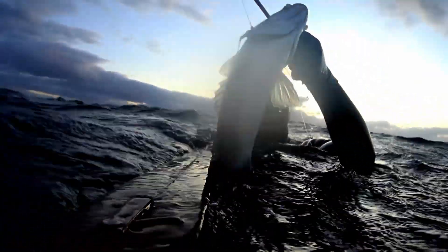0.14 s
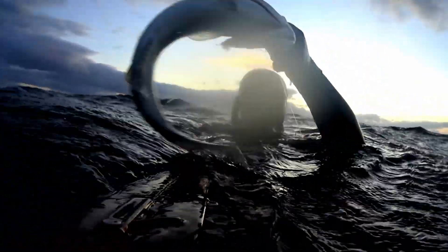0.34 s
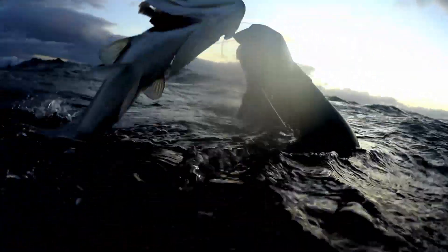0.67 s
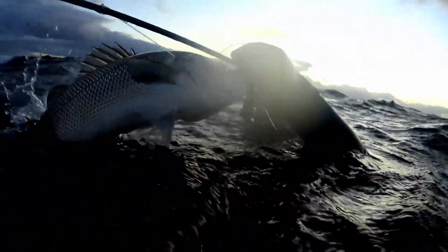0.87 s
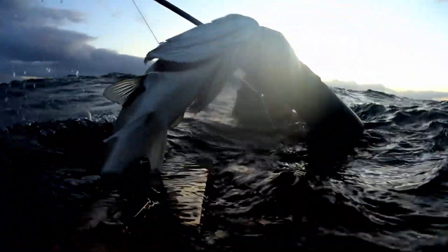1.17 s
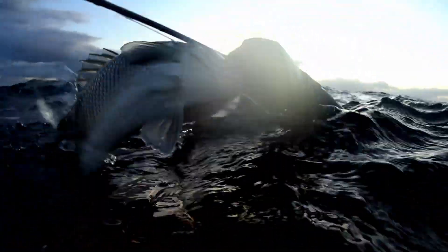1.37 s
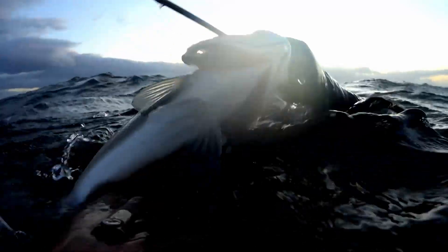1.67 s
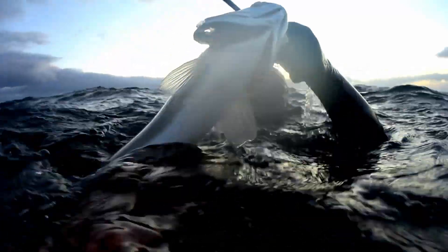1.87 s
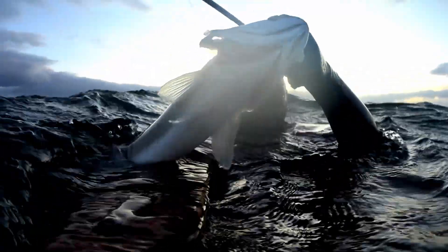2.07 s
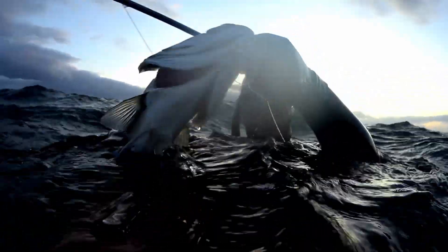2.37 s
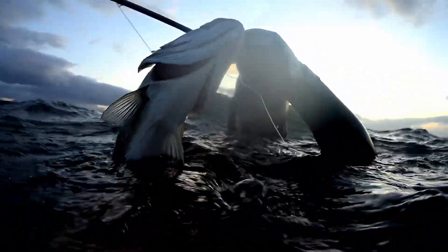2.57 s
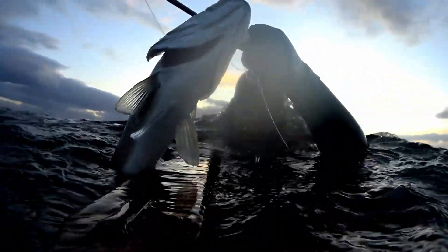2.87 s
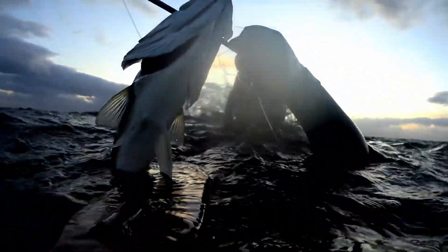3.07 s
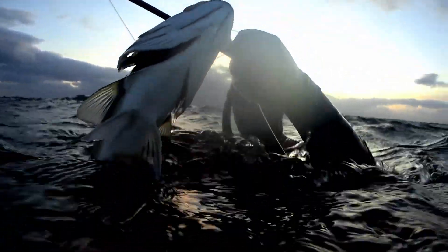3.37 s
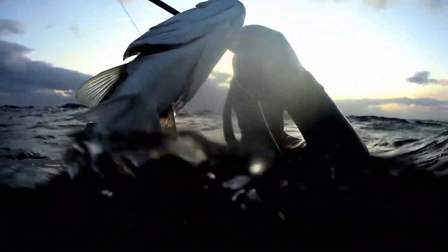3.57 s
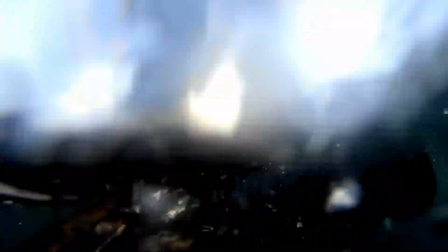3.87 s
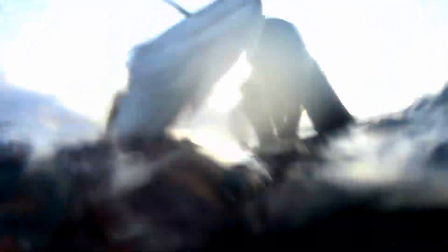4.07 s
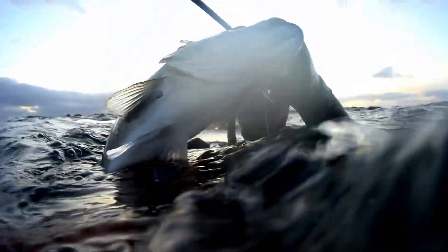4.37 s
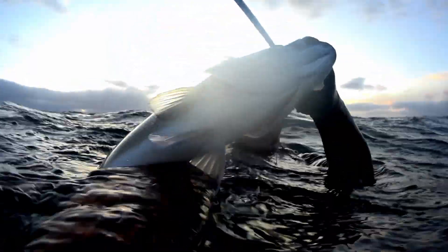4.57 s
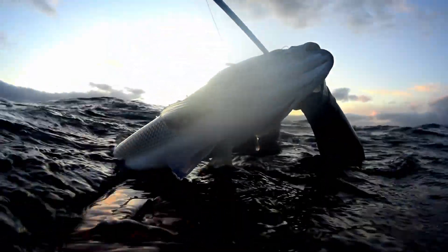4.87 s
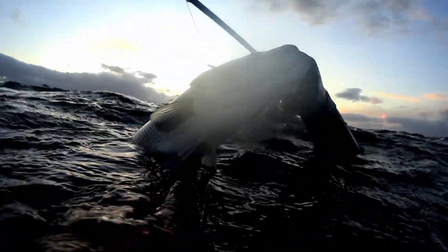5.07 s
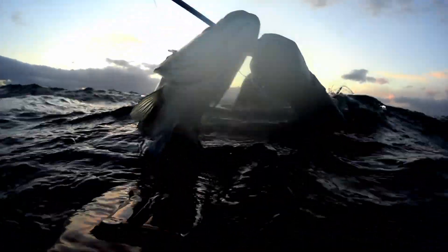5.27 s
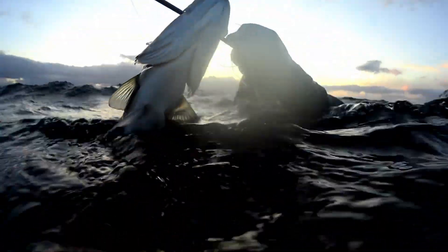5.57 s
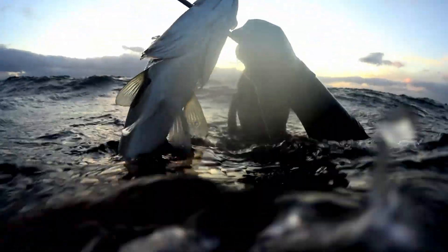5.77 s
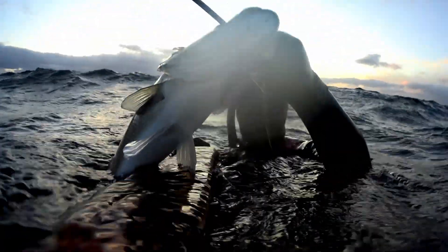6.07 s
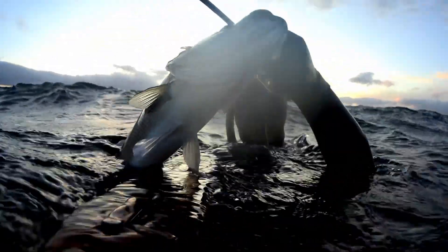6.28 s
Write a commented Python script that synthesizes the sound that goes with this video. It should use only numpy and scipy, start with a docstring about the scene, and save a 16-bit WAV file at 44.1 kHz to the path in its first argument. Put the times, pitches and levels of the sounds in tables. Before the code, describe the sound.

Uneven surface sloshing close up, with bubbly plops, dull spray slaps and low swell thuds that bunch up, thin out, then bunch again.

```python
"""Choppy sea water sloshes round a camera in a waterproof case at the surface, for 6.4 s.
Throughout, swell, churning bubble swarms and froth rise and sink with passing wavelets.
Scattered plops (ringing air pockets) and a few slaps of spray come first, with light thuds of swell.
They crowd together from 3.3 to 4.3 s, thin out to mostly low, faint plops, and crowd again from 5.5 to 6.1 s.
A faint hiss lies under it all; the top of the band is cut off."""
import sys
import numpy as np
from scipy.fft import rfft, irfft, next_fast_len
from scipy.io import wavfile
from scipy.ndimage import uniform_filter1d, map_coordinates

SR = 44100
rng = np.random.default_rng(int(sys.argv[2]) if len(sys.argv) > 2 else 0)


def store_wav(level_fs):
    """Save 16-bit WAV to argv[1]."""
    pcm = np.round(np.clip(np.atleast_2d(level_fs), -1, 1) * 32767)
    wavfile.write(sys.argv[1], SR, pcm.T.astype(np.int16))


N = 283549

# what the case lets through, spectrum shape: f/Hz, level/dB
CASE_PASS = [(100, -11.5), (500, 17), (1600, 11), (2700, 4), (3700, -1.5), (4800, -12), (6400, -10),
             (8500, -22.5), (15000, -33.5)]


def amp(db):
    """Amplitude of a level in dB."""
    return 10 ** (np.asarray(db) / 20)


def unit(x):
    """x scaled to rms 1 over all channels."""
    return x / np.sqrt(np.mean(x ** 2) + 1e-20)


def gains(points, hz):
    """Gain of (f/Hz, level/dB) points, read on a log frequency axis."""
    f, db = np.transpose(points)
    return amp(np.interp(np.log(hz + 1), np.log(f), db))


def filtered(x, response):
    """x times a response of frequency, by zero-padded FFT."""
    n = x.shape[-1]
    m = next_fast_len(n + 2 ** 12)
    spectrum = rfft(x, m) * response(np.fft.rfftfreq(m, 1 / SR))
    return irfft(spectrum, m)[..., :n]


def coloured(x, points):
    """x shaped by the given spectrum, at rms 1."""
    return unit(filtered(x, lambda hz: gains(points, hz)))


def noise(length=N):
    """Stereo white noise, independent at each port."""
    return rng.standard_normal((2, length))


def wobble(rate_hz):
    """Smooth random curve, rate_hz knots a second."""
    knots = rng.standard_normal(int(N * rate_hz / SR) + 4)
    return map_coordinates(knots, [np.arange(N) * rate_hz / SR])


def sides(db):
    """Left and right gains for a left-over-right level difference, at equal power."""
    return unit(amp(np.array([[db], [-db]]) / 2))


def add(out, s, sound):
    """Mix a stereo sound in at time s."""
    part = out[:, max(0, round(s * SR)):][:, :sound.shape[1]]
    part += sound[:, :part.shape[1]]


def even(x):
    """Swarm held to an even mean level, so that the waves alone set its strength."""
    power = uniform_filter1d(np.mean(x ** 2, axis=0), size=2200)
    return x / np.sqrt(np.abs(power) + 0.0064)


def together(calm_db, *parts):
    """Amplitude of independent parts over a calm level: powers add."""
    return np.sqrt(amp(calm_db) ** 2 + sum(part ** 2 for part in parts))


def bubble(t, hz, swell, fade, rise):
    """An air pocket swells as it pinches off, then rings out, rising in pitch as it nears the surface."""
    t = np.maximum(t, 0)
    attack = np.sin(np.pi / 2 * np.minimum(t / swell, 1)) ** 2
    decay = np.exp(1 / 2 - np.hypot(np.maximum(t - swell, 0) / fade, 1 / 2))
    cycles = hz * t * (1 + np.log(2) * rise * t / 2)
    return attack * decay * np.sin(2 * np.pi * cycles)


def swarm(starts, length, low_hz, high_hz, cycles, spread_db, rise, size):
    """Small bubbles born at the given samples; each reaches the two ports with its own strength and delay."""
    pitch, life, strength, pan, lag = rng.random((len(starts), 5)).T[..., None]
    hz = low_hz * (high_hz / low_hz) ** pitch
    fade_s = cycles * 2 ** (2 * life - 1) / hz
    k = np.arange(size)
    at = (starts.astype(int)[:, None] + k).ravel()
    taper = 1 - k / size
    pair = []
    for side in (-1, 1):
        delay_s = (1 / 2 + side * (lag - 1 / 2) / 2) / hz
        ring = bubble(k / SR - delay_s, hz, 2 / hz, fade_s, rise)
        gain = amp(spread_db * strength ** 2 + side * 11.5 * (pan - 1 / 2)) * hz
        pair.append(np.bincount(at, (ring * gain * taper).ravel(), length)[:length])
    return unit(np.array(pair))


def crests(events, now):
    """Amplitude of passing crests: each builds up and sinks back, and their powers add."""
    crest_shape, back_stretch = 1.57, 1.34  # 1 = peaked, 2 = round; back length over front length
    s, db, half_s = np.transpose(events)[..., None]
    distance = np.maximum(s - now, (now - s) / back_stretch) / half_s
    return np.linalg.norm(amp(db) * np.exp(-distance ** crest_shape), axis=0)


def foam(now):
    """Amplitude of the froth on breaking crests: it flares up and fizzes away."""
    # crests breaking into froth: t/s, level/dB, fade/s
    breaking_crests = [(0.538, -60, 0.027), (1.861, -46, 0.021), (2.83, -56.5, 0.024), (3.42, -47.5, 0.085),
                       (3.611, -39, 0.1), (3.69, -43, 0.06), (3.97, -49, 0.15), (5.59, -56.5, 0.14),
                       (5.75, -52, 0.082), (5.87, -46, 0.034), (6.07, -58.5, 0.19)]
    rise_s = 0.034
    s, db, fade_s = np.transpose(breaking_crests)[..., None]
    distance = np.maximum((s - now) / rise_s, (now - s) / fade_s)
    return np.linalg.norm(amp(db) * np.exp(-distance), axis=0)


def swell_pressure(chop):
    """Swell presses on the case: low noise that follows the wavelets."""
    # spectrum shape: f/Hz, level/dB
    swell_spectrum = [(20, -21.5), (44, -22.5), (58, 8.5), (72, -4.5), (100, -3), (150, -17), (400, -81.5)]
    calm_db, wave_db = -68, -16.5  # between waves; relative to wavelet churn
    level = together(calm_db, amp(wave_db) * chop)
    return level * even(coloured(noise(), swell_spectrum))


def churning(chop, lap):
    """Bubble swarms and noise churn with the wavelets; single small bubbles trickle on top."""
    # spectrum shape: f/Hz, level/dB
    churn_spectrum = [(50, -21), (110, -5), (170, 2.5), (280, -6.5), (390, 1.5), (490, -10), (650, -9),
                      (1000, -22), (2000, -43.5), (5000, -77.5)]
    calm_db, ripple_db, trickle_db = -62, 1.9, -22.5  # trickle relative to churn
    level = together(calm_db, chop)
    gurgle = swarm(N * rng.random(900), N, low_hz=96.64, high_hz=713, cycles=6.1,
                   spread_db=7.5, rise=1.9, size=2600)
    churn = even(coloured(gurgle, churn_spectrum) + coloured(noise(), churn_spectrum) / 2)
    trickle = swarm(N * rng.random(260), N, low_hz=596, high_hz=1824, cycles=4.9,
                    spread_db=14.5, rise=5.1, size=800)
    return level * (amp(ripple_db * lap) * churn + amp(trickle_db) * trickle)


def frothing(chop, breakers, lap):
    """Froth fizzes on the crests: gentle lapping mostly whispers, breaking water is full of bubbles."""
    # spectrum shape: f/Hz, level/dB
    froth_spectrum = [(300, -19), (700, 11), (1200, 14.5), (2000, -5.5), (3200, -21.5), (4800, -48),
                      (6500, -31.5), (9000, -28), (15000, -40)]
    calm_db, wave_db, ripple_db = -72.5, -29.5, 4  # wave_db relative to wavelet churn
    level = together(calm_db, amp(wave_db) * chop, breakers)
    fizz = swarm(N * rng.random(4500), N, low_hz=650, high_hz=7000, cycles=4,
                 spread_db=13, rise=4, size=320)
    bubble_share = np.clip((20 * np.log10(level) + 76) / 20, .3, .85)  # of power
    bubbles = np.sqrt(bubble_share) * even(coloured(fizz, froth_spectrum))
    whisper = np.sqrt(1 - bubble_share) * coloured(noise(), froth_spectrum)
    return amp(ripple_db * lap) * level * (bubbles + whisper)


def mist(breakers, lap):
    """Breaking froth throws fine spray on the case: noise coloured by the case."""
    mist_db, ripple_db = -18, -0.5  # mist relative to breaking froth
    return amp(ripple_db * lap) * amp(mist_db) * breakers * coloured(noise(), CASE_PASS)


def sea():
    """Wavelets drive swell, churn and froth; breaking crests add froth and mist; ripples shake the last three."""
    # wavelets passing the case: crest t/s, churn level/dB, half length of front/s
    wavelets = [ (.17, -45, 0.068), (.31, -41, 0.072), (.51, -45, 0.067), (.86, -53.5, 0.049),
                (1.11, -55.5, 0.097), (1.26, -48.5, 0.076), (1.62, -54.5, 0.084), (1.78, -44, 0.056),
                (2.13, -40, 0.099), (2.25, -42, 0.064), (2.87, -50.5, 0.037), (3.07, -50.5, 0.15),
                (3.35, -44, 0.097), (3.63, -42, 0.08), (3.9, -37.5, 0.15), (4.28, -43.5, 0.082),
                (4.44, -46.5, 0.04), (4.59, -47.5, 0.12), (4.75, -44, 0.017), (5.02, -42.5, 0.06),
                (5.58, -47.5, 0.11), (5.83, -40, 0.051), (6.06, -47, 0.09), (6.23, -42, 0.039),
                (6.37, -57, 0.062)]
    now = np.arange(N) / SR
    chop, breakers = crests(wavelets, now), foam(now)
    ripple = wobble(28)
    lap = ripple + np.abs(ripple) / 2  # short crests, calm troughs
    water = swell_pressure(chop) + churning(chop, lap)
    return water + frothing(chop, breakers, lap) + mist(breakers, lap)


def surges():
    """Each surge throbs at one deep, unsteady pitch and shoves water along the case."""
    # swell thudding on the case: crest t/s, throb level/dB, half length of front/s, f/Hz
    thuds = [(0.16, -47.5, 0.12, 75.7), (.315, -39, 0.033, 78.7), (1.664, -49, 0.044, 60.7),
             (1.79, -49.5, 0.044, 66.5), (2.362, -45, 0.056, 63.3), (3.246, -45, 0.079, 58),
             (3.443, -38, 0.029, 60.5), (3.952, -43.5, 0.028, 60.2), (5.596, -33, 0.03, 60),
             (5.708, -45.5, 0.063, 55)]
    # water shoved along the case, spectrum shape: f/Hz, level/dB
    rumble_spectrum = [(50, -7), (140, 0.5), (220, -12), (900, -67.5)]
    rumble_db = -7.5  # rms, relative to throb amplitude
    waver_rad, port_phase_rad = 1, 0.71  # port phase: offset from the middle
    out, t = np.zeros((2, N)), np.arange(-SR // 4, SR // 2) / SR
    for s, db, half_s, hz in thuds:
        drift = waver_rad * map_coordinates(rng.standard_normal(24), [(t - t[0]) * 30], mode="nearest")
        throb = np.sin(2 * np.pi * hz * t + drift + port_phase_rad * np.array([[1], [-1]]))
        rumble = amp(rumble_db) * coloured(noise(len(t)), rumble_spectrum)
        add(out, s + t[0], crests([(0, db, half_s)], t) * (throb + rumble))
    return out


def slaps():
    """A sheet of water breaks on the case: a ragged cluster of tiny bubbles and spray over a dull knock."""
    # spray landing: t/s, level before trims/dB, treble/dB, knock relative to spray before trims/dB, fade/ms
    spray_sheets = [ (.525, -48, -10.5, 0, 3.4), (.822, -52.5, -45, -19, 5), (.995, -53.5, -33, 0, 9.4),
                    (1.769, -34, -21.5, -7, 4.4), (2.78, -62.5, 2, 0.5, 6.2), (2.835, -54.5, -17, -13, 3.2),
                    (2.845, -60.5, -11, -12.5, 3), (2.863, -58, -45, 16, 2.12), (3.429, -38, -25, 5, 5),
                    (3.450, -54.5, -44, 13.5, 3.8), (3.575, -40, -17.5, 8, 3.9),
                    (3.595, -38, -13, 1.5, 3.7), (3.615, -35, -7.5, -1, 3.3),
                    (3.652, -29.5, -26.5, -9.5, 3.8), (3.668, -32.5, -41, -16, 6),
                    (3.68, -35.5, -23, 3.5, 5.5), (3.732, -48.5, -18.5, -6.5, 3.7),
                    (3.755, -42.5, -32, 6, 5), (3.770, -48, -17, 8, 4.2), (3.805, -48, -9, 5.5, 3.5),
                    (3.848, -64.5, -12, 13, 2.5), (3.976, -46.5, -31, 11.5, 3),
                    (4.053, -41.5, -59, 5.5, 4.2), (4.16, -41, -20, -24, 5), (4.908, -56, -47, 7, 2.6),
                    (5.557, -53.5, -13, 14.5, 3.8), (5.58, -40, -20.5, 3, 5), (5.598, -39, -35, -9.5, 7.2),
                    (5.617, -40, -37, -13, 6), (5.835, -33.5, -27, -2.5, 2), (5.984, -42, -19, -15, 3.7),
                    (6.012, -48.5, -38, 3, 5.3), (6.055, -46.5, 1.5, 10, 7.7), (6.11, -50.5, -34, -11, 12)]
    # knock, spectrum shape: f/Hz, level/dB
    knock_spectrum = [(60, -11.5), (200, 3), (600, -1.5), (1300, -6), (3000, -34.5), (8000, -87)]
    spray_trim_db, knock_trim_db = -12.0, -5.0
    dull_hz, bright_hz, flat_treble_db = 2610, 5050, -16.5  # tilt range; treble that leaves spray flat
    out, t = np.zeros((2, N)), np.arange(SR // 8) / SR
    lead_s = .012  # first drops arrive ahead of the sheet
    for s, db, treble_db, knock_db, fade_ms in spray_sheets:
        late, fade_s = t - lead_s - .004, fade_ms / 1000
        runoff = .1 * np.exp(-np.maximum(late / 3, -late) / fade_s)
        sheet = np.exp(-np.hypot(late, fade_s / 2) / fade_s)
        envelope = (sheet + runoff) * np.minimum(t / lead_s, 1)
        # bubbles form where the water is thickest
        thickness = np.cumsum(envelope ** 2) / np.sum(envelope ** 2)
        births = np.searchsorted(thickness, rng.random(48))
        drops = swarm(births, len(t), low_hz=1256, high_hz=11000, cycles=11,
                      spread_db=24.5, rise=0.93, size=600)
        burst = drops + 0.78 * unit(noise(len(t)) * envelope)
        tilt = [(dull_hz, 0), (bright_hz, treble_db - flat_treble_db)]
        spray = filtered(burst, lambda hz: gains(CASE_PASS, hz) * gains(tilt, hz))
        knock = coloured(noise(len(t)) * envelope, knock_spectrum)
        add(out, s - lead_s, amp(db + spray_trim_db) * unit(spray))
        add(out, s - lead_s, amp(db + knock_db + knock_trim_db) * knock)
    return out


def plops():
    """Large air pockets: the faster one dies, the faster its pitch climbs; water rustles as it closes over."""
    # peak t/s, starting f/Hz, peak level/dB, fade/ms, left over right/dB, right lag/ms
    air_pockets = [ (0.15, 384, -33, 4.3, -1, -.6), (.297, 840, -44, 4.6, 7, 0),
                   (0.415, 996, -31, 8.1, 5, -0.37), (0.599, 1522, -36, 4.1, -3, .2),
                   (0.755, 1256, -27, 0.93, 2, -0.11), (.821, 386, -36.5, 5.3, 5, -0.86),
                   (0.926, 1123, -41.5, 7, -4, 0.37), (1.001, 856, -43, 4.7, 3, -0.27),
                   (1.078, 1353, -40, 7.5, -3, -.3), (1.654, 1560, -45.5, 2, 8, 0),
                   (1.773, 1055, -26, 1.5, 4, 0), (1.816, 1017, -20.5, 8, 1.5, -0.21),
                   (1.888, 1121, -30.5, 11.3, 11, -0.16), (1.961, 418, -24, 4.9, -4.5, -0.057),
                   (1.979, 1116, -38.5, 1.4, 5, 0), (2.653, 800, -48.5, 1.8, 6, 0),
                   (2.805, 1093, -19, 6.4, 6, 0), (2.867, 1950, -35.5, 0.91, -2, 0.045),
                   (3.35, 664, -26, 3.4, 1.5, 0.56), (3.392, 471, -15, 7.6, 3, 0),
                   (3.423, 513, -18, 14, 1, -.2), (3.454, 1473, -23, 4.4, -7.5, 0.24),
                   (3.581, 454, -17.5, 24, 1.5, 1.1), (3.597, 663, -14.5, 9.9, 3, -0.37),
                   (3.624, 1062, -24, 6.5, -6, -0.43), (3.685, 1490, -26.5, 4, 7, -0.28),
                   (3.71, 955, -22.5, 5.3, 6, -0.013), (3.763, 1200, -27, 4.2, 2, 0.27),
                   (3.779, 930, -22.5, 13, 3.5, 0), (3.908, 877, -25, 4.8, -1, 0),
                   (3.913, 390, -23, 5.1, 5, 0.35), (3.922, 1207, -16.5, 5.1, -3, 0.34),
                   (3.941, 654, -15, 7.8, 0, -.5), (3.980, 818, -28.5, 13.3, 4, 0.51),
                   (4.013, 494, -26, 4.9, -2.5, -0.73), (4.056, 2630, -39.5, 4.9, 0, 0),
                   (4.075, 952, -17, 6, 2, -0.26), (4.202, 970, -29.5, 10.3, 6, .5),
                   (4.205, 1375, -35.5, 4.4, 16, -0.66), (4.241, 1185, -26, 5, 7, .4),
                   (4.258, 389, -39, 25, -1, 0), (4.385, 383.3, -40, 40, 4, 0),
                   (4.464, 495, -35, 3.8, -4, -0.37), (4.573, 314, -32.5, 5.2, -1, .3),
                   (4.62, 602, -37, 3, 1, 0.33), (4.771, 189, -39, 15, 3, 0),
                   (4.97, 310, -38.5, 10, -5, 0.1), (4.989, 650, -27.5, 4.4, 2, 0.45),
                   (5.108, 285, -38, 5.4, -3.5, 0), (5.141, 354, -42, 11.5, 0, 0.34),
                   (5.441, 177.5, -40.5, 10, -3, -0.83), (5.561, 494, -38, 4.9, -9, 0.48),
                   (5.586, 477, -19.5, 1.9, -1, 1.33), (5.625, 1960, -33, 2.4, 3, -0.063),
                   (5.761, 1835, -43, 7, 7, -0.089), (5.836, 1460, -20.5, 2.6, 2, 0.22),
                   (5.848, 693, -18.5, 9.8, 2, -0.16), (5.846, 1008, -14.5, 3.2, 10, 0.49),
                   (5.854, 1180, -19, 6.1, 8, -0.27), (5.872, 1750, -30, 1.9, 1.5, 0),
                   (5.926, 1148, -15, 6.6, 4, 0.35), (5.949, 1280, -29, 4.1, -0.5, 0.2),
                   (5.959, 1530, -42, 2.4, -2, 0.093), (5.997, 1820, -30, 0.77, 2, 0),
                   (6.068, 304, -31, 7.1, 2, 0.78), (6.219, 340.5, -30, 11, -4, -0.6)]
    # water closing over a pocket, spectrum shape: multiple of pocket f/1, level/dB
    rustle_spectrum = [(.17, -7), (1, 4), (1.5, -10.5), (3, -40.5), (8, -69)]
    rustle_db = -13  # noise rms before its hump, relative to pocket peak
    pinch_s, pinch_power = 0.004018, 0.618  # pinch-off time at 1 kHz; larger pockets take longer
    lead_s = 0.017  # water starts to move before the pocket peaks
    out, t = np.zeros((2, N)), np.arange(SR // 8) / SR
    for s, hz, db, fade_ms, pan_db, lag_ms in air_pockets:
        fade_s, lag_s, khz = fade_ms / 1000, lag_ms / 1000, hz / 1000
        swell_s = pinch_s / khz ** pinch_power
        waver = map_coordinates(rng.standard_normal(32), [t * 220], mode="nearest")
        port_shift_s = np.array([[lag_s], [-lag_s]]) / 2 - abs(lag_s) / 2
        at_ports = t + 0.041 * waver / hz + port_shift_s
        ring = bubble(at_ports, hz, swell_s, fade_s, 0.035 / fade_s)
        add(out, s - swell_s, amp(db) * sides(pan_db) * ring)
        rustle = coloured(noise(len(t)), [(hz * k, level) for k, level in rustle_spectrum])
        hump = np.exp(-np.abs(t - lead_s) / 0.0078) * np.minimum(t / lead_s, 1)
        add(out, s - lead_s, amp(db + rustle_db) * hump * rustle)
    return out


def scene():
    """Sea, surges, slaps and plops, summed."""
    return sea() + surges() + slaps() + plops()


def record(dry):
    """The camera adds a faint hiss and keeps nothing above its band limit."""
    # spectrum shape: f/Hz, level/dB
    hiss_spectrum = [(30, 12.5), (300, 3), (1500, 19), (4000, 8.5), (8000, 2), (16000, -1)]
    hiss_db, top_hz = -77.0, 15720
    hiss = amp(hiss_db) * coloured(noise(), hiss_spectrum)
    return filtered(dry + hiss, lambda hz: hz < top_hz)


dry = scene()
out = record(dry)
store_wav(out)
```